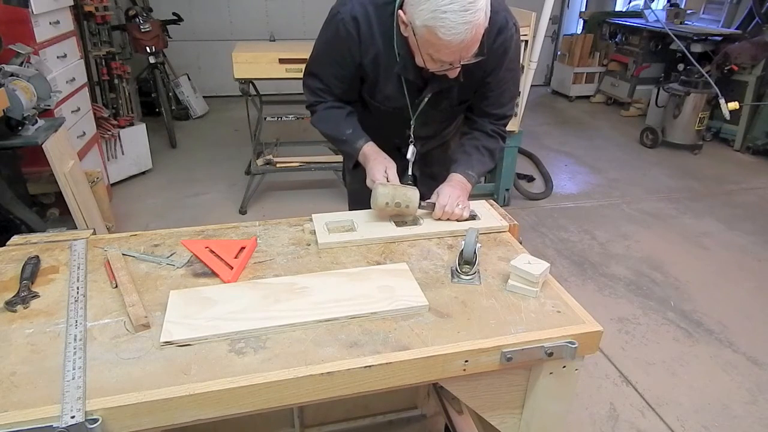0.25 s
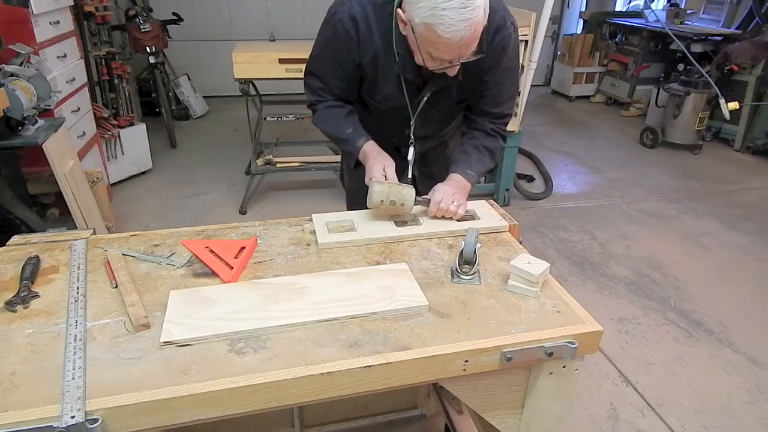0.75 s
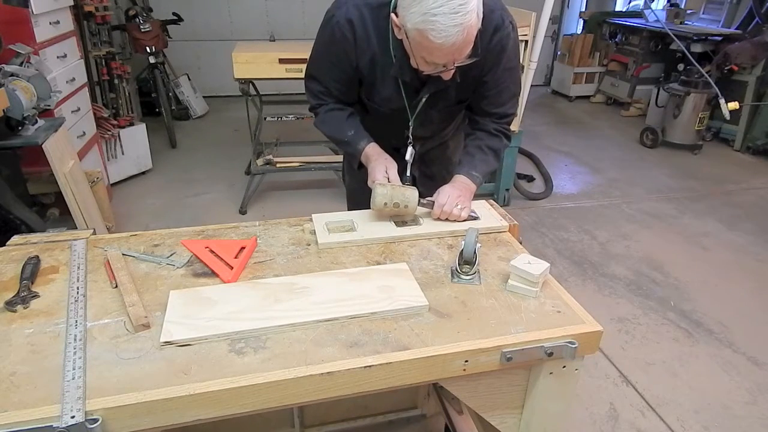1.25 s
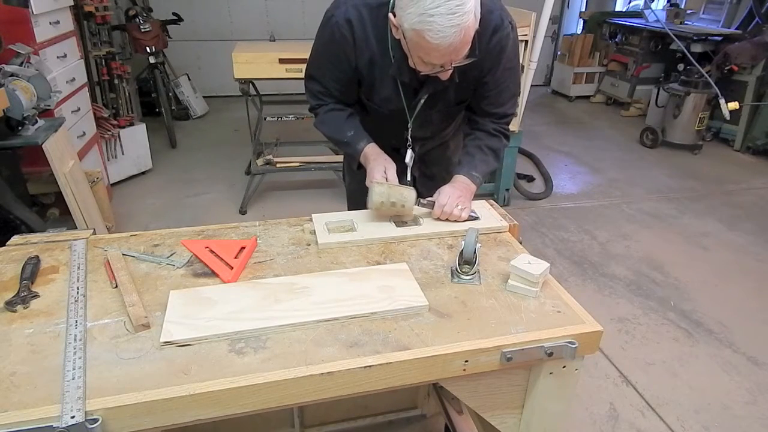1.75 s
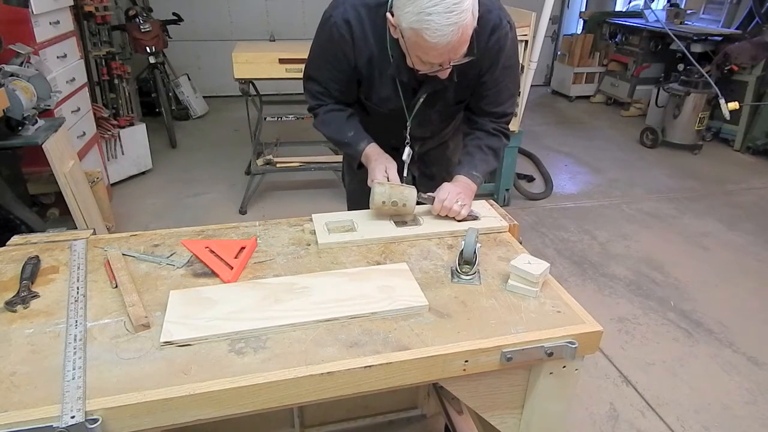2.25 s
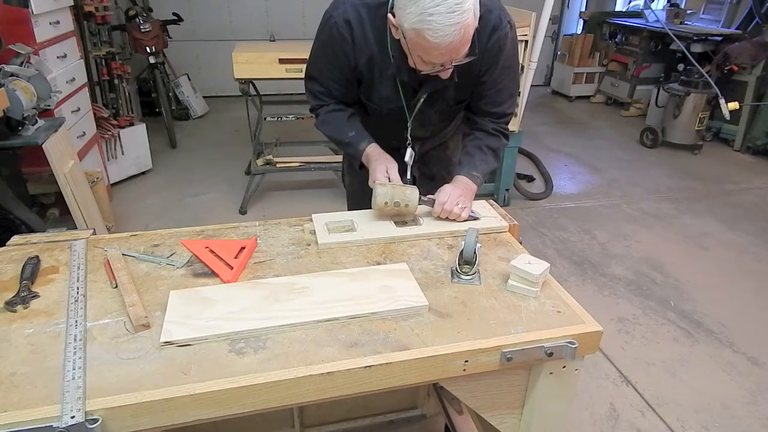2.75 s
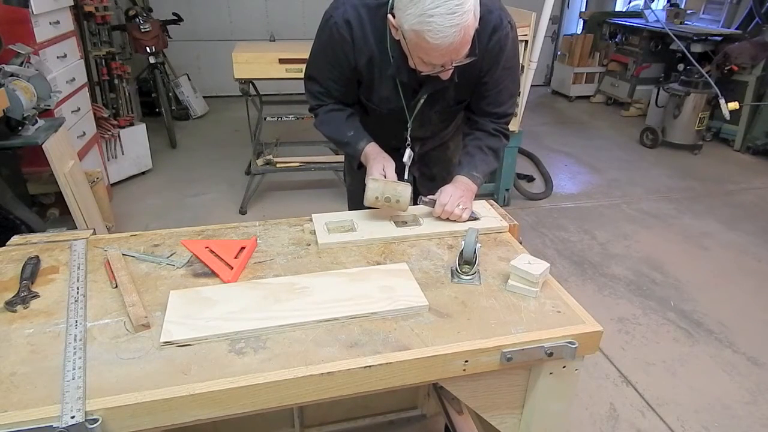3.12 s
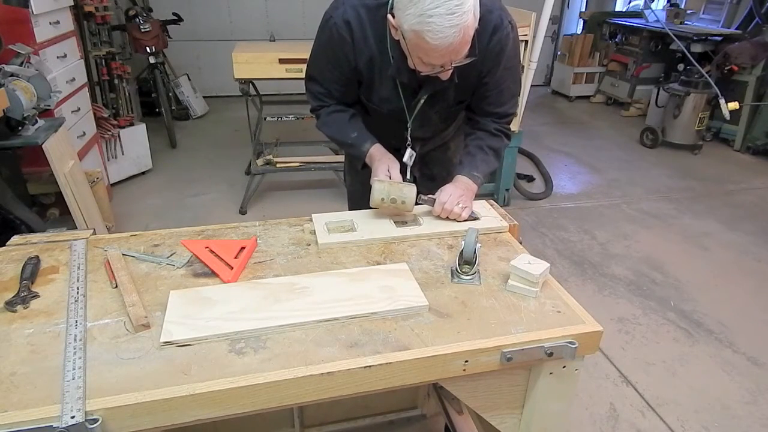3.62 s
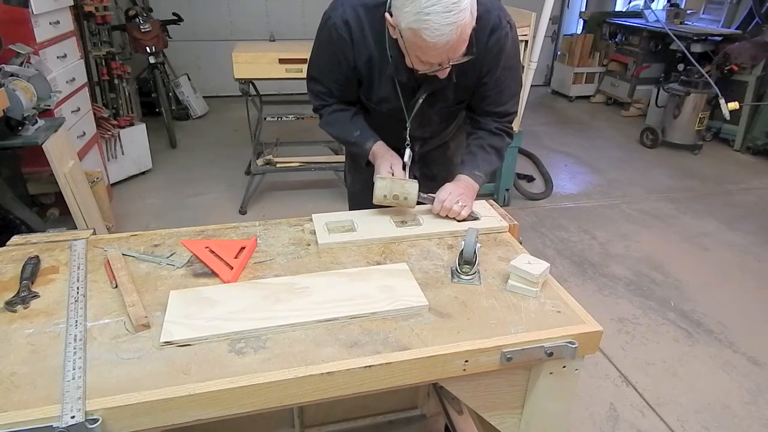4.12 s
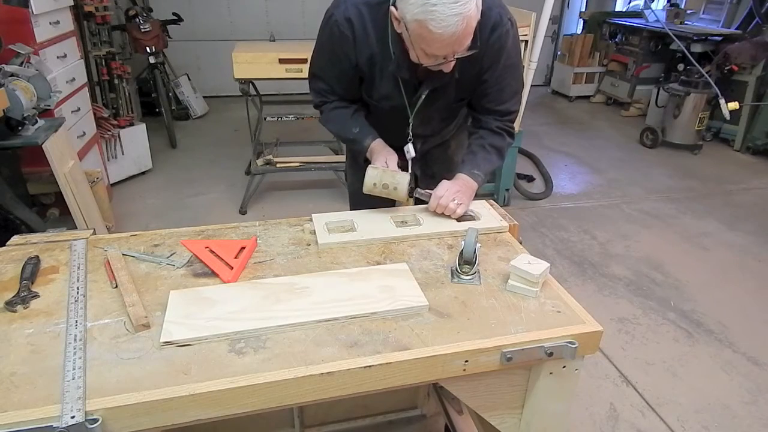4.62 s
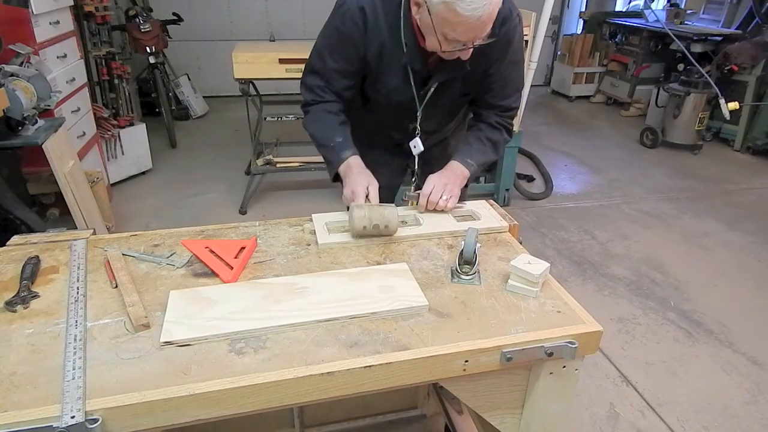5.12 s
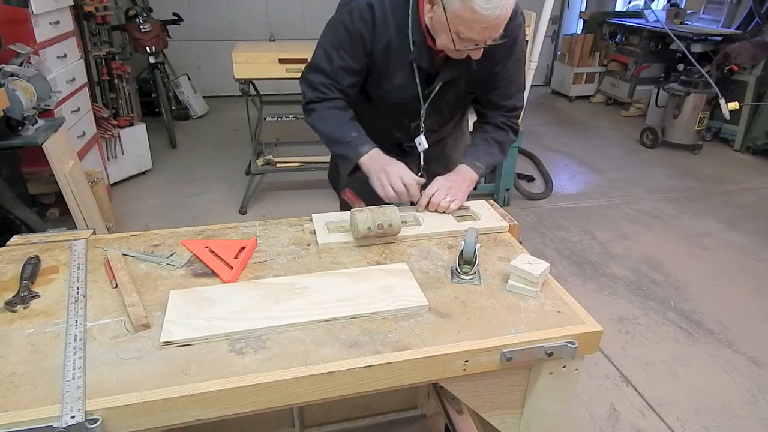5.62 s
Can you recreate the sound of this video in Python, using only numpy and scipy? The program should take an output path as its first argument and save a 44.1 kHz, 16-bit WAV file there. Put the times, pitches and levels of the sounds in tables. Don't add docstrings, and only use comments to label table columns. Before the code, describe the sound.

In a concrete garage workshop, a wooden mallet strikes a chisel in a board on a heavy bench. Three quick knocks, a pause, three more, another pause, then six evenly spaced blows, each a bright crack with a hollow woody ring. A small scrape and metallic tick follow, then the mallet lands on the bench in a few wooden knocks. Fairly close stereo microphone, faint motor hum beneath.

```python
import sys
import numpy as np
from scipy import signal
from scipy.io import wavfile
from scipy.ndimage import uniform_filter1d

SR = 44100
rng = np.random.default_rng(int(sys.argv[2]) if len(sys.argv) > 2 else 0)


def field_ratio(decibels):
    return 10 ** (np.asarray(decibels, dtype=float) / 20)


def wrap_up_sound(samples):
    columns = np.atleast_2d(samples).T
    tamed = np.clip(columns, -1, 1)
    steps = np.round(tamed * 32767).astype(np.int16)
    wavfile.write(sys.argv[1], SR, steps)


N = 258426
LEAD = 4096


def at_hz(points, hz):
    curve_hz, value = np.array(points).T
    return np.interp(np.log(hz), np.log(curve_hz), value)


EDGES_HZ = 25 * 2 ** np.arange(0, 9.6, .5)
# frequency in Hz, correlation (clipped to 0..1).
LIKENESS = [(60, 0.89), (150, 0.87), (380, 0.87), (950, 0.89), (2380, 0.096), (5980, -1.85), (15000, -.5)]
# frequency in Hz, left over right in dB.
LEFT_OVER_RIGHT = [(60, -2), (180, -3), (550, -2.0), (1650, -2), (4970, -1.5), (15000, 0)]


def stereo_bands(size):
    white = rng.standard_normal((2, 2, size + LEAD))
    for k, (low_hz, high_hz) in enumerate(zip(EDGES_HZ, EDGES_HZ[1:])):
        hz = np.sqrt(low_hz * high_hz)
        band = signal.butter(2, [low_hz, high_hz], "band", fs=SR, output="sos")
        mid, side = signal.sosfilt(band, white[k % 2])[:, LEAD:]
        alike = np.clip(at_hz(LIKENESS, hz), 0, 1)
        lean = field_ratio(at_hz(LEFT_OVER_RIGHT, hz) / 2 * np.array([[1], [-1]]))
        yield hz, lean * (np.sqrt(1 + alike) * mid + np.sqrt(1 - alike) * side * [[1], [-1]])


# frequency in Hz, density in dB per Hz.
FLOOR = [(15, -34), (25, 9.5), (92, 5.5), (373, -3.5), (476, -4.5), (659, -8), (962, -8), (1040, -16),
         (1440, -7), (2000, -16), (16000, -28.5)]
# frequency in Hz, level in dB rms.
HUM = [(120, -56.5), (479.5, -60), (959, -61.5), (1200, -70), (1438, -68.5)]


def background(floor_db=-49):
    noise = sum(band * field_ratio(at_hz(FLOOR, hz)) for hz, band in stereo_bands(N))
    t = np.arange(N) / SR
    hum = sum(np.sqrt(2) * field_ratio(level_db) * np.sin(2 * np.pi * (hz * t + rng.random()))
              for hz, level_db in HUM)
    return field_ratio(floor_db) * noise / noise.mean(axis=0).std() + hum


# frequency in Hz, T60 in seconds.
ROOM_T60 = [(60, 1), (160, 0.46), (420, 0.8), (1100, 0.59), (2900, 0.67), (7700, 0.52), (14000, 0.36)]
# frequency in Hz, level in dB.
ROOM_COLOUR = [(60, -10), (150, 2), (400, -2.5), (1000, 2), (2000, -5), (3800, -3), (5400, -22), (7600, -6),
               (10800, -4), (15200, -2)]


def workshop(x, first_echo_s=0.00043, build_s=0.0013):
    t = np.arange(SR) / SR
    tail = sum(band * field_ratio(at_hz(ROOM_COLOUR, hz) - 60 * t / at_hz(ROOM_T60, hz))
               for hz, band in stereo_bands(SR))
    tail = tail * (1 - np.exp(-np.maximum(t - first_echo_s, 0) / build_s))
    return signal.fftconvolve(x[None], tail, axes=1)[:, :x.size]


# centre time in seconds, level in dB, length in seconds, centre in Hz.
RUSTLES = [(0.663, -53, .05, 9800), (0.777, -56.5, 0.092, 8000), (0.904, -54, 0.42, 3800),
           (0.918, -57, 0.091, 11000), (4.583, -34, 0.017, 4150), (1.22, -50.5, 0.044, 3260),
           (2.465, -62, .03, 3300), (3.927, -45, 0.0075, 8600), (4.577, -43.5, 0.033, 9700),
           (5.713, -52, 0.085, 11800), (5.815, -49, 0.059, 10700)]


def rustles():
    out = np.zeros(N + LEAD)
    t = (np.arange(N + LEAD) - LEAD) / SR
    grains = rng.standard_normal(N + LEAD) * field_ratio(rng.exponential(1, N + LEAD))
    grains = grains / grains.std()
    for s, level_db, length_s, hz in RUSTLES:
        band = signal.butter(2, [hz * .65, min(hz * 1.5, .45 * SR)], "band", fs=SR, output="sos")
        stroke = np.exp(-((t - s) / length_s * 2) ** 2)
        out += field_ratio(level_db) * stroke * signal.sosfilt(band, grains)
    return out


def clicks_of(rows, column, extra_db, delay_s=0):
    rows, clicks = np.array(rows), np.zeros(N + LEAD)
    at = np.round((rows[:, 0] + delay_s) * SR).astype(int) + LEAD
    clicks[at] = field_ratio(rows[:, column] + extra_db)
    return clicks


def ring(clicks, hz, t60_s):
    r, w = field_ratio(-60 / (t60_s * SR)), 2 * np.pi * hz / SR
    return signal.lfilter([0, np.sin(w)], [1, -2 * r * np.cos(w), r * r], clicks + 1e-18)


def swell(x, hz, rise_s):
    r = np.exp(-1 / (rise_s * SR))
    poles = [1, -2 * r * np.cos(2 * np.pi * hz / SR), r * r]
    return signal.lfilter([(1 - r * r) / 2, 0, (r * r - 1) / 2], poles, x)


def struck(modes, rows, column, trim_db, scatter_db, rise_cycles=0, delay_s=0):
    out = np.zeros(N + LEAD)
    for k, (hz, level_db, t60_s) in enumerate(modes):
        hit_db = level_db + trim_db + scatter_db * rng.standard_normal(len(rows))
        clicks = clicks_of(rows, column, hit_db, delay_s)
        sound = ring(clicks * (-1) ** k, hz, t60_s)
        out += swell(sound, hz, rise_cycles / hz) if rise_cycles else sound
    return out


def contact(rows, edges_hz, bands, delay_s):
    out = np.zeros((3, N + LEAD))
    for k, ((low_hz, high_hz), (trim_db, t60_s)) in enumerate(zip(edges_hz, bands)):
        clicks = clicks_of(rows, k + 1, trim_db, delay_s)
        envelope = signal.lfilter([1], [1, -field_ratio(-60 / (t60_s * SR))], clicks + 1e-18)
        common, unlike = envelope * rng.standard_normal((2, N + LEAD))
        alike = at_hz(LIKENESS, np.sqrt(low_hz * high_hz))
        unlike = unlike * np.sqrt(np.clip(1 - alike, 0, 1))
        click = clicks * np.sqrt(t60_s * SR / np.log(1e6)) * (-1) ** k + 1e-18
        band = signal.butter(2, [low_hz, high_hz], "band", fs=SR, output="sos")
        out += signal.sosfilt(band, [common, unlike, click]) * np.sqrt(SR / 2 / (high_hz - low_hz))
    return out


# start in seconds, then knock, board, floor thud, bench in dB.
BLOWS = [(-.004, -14.5, -16.5, -16, -16), (0.1939, -12, -8.5, -19, -25.5), (0.4217, -9, -15, -27.5, -29),
         (1.5674, -20.5, -11.5, -20.5, -34), (1.794, -14, -13, -27, -22), (2.0169, -12, -22.5, -31.5, -32),
         (3.0025, -13, -16.5, -18, -19.5), (3.2385, -11.5, -21.5, -15, -17),
         (3.4711, -12, -26.5, -17, -18.5), (3.8246, -11.5, -28, -20, -15), (4.0698, -12, -22, -21.5, -17.5),
         (4.3245, -13.5, -16, -27, -29.5)]
# start in seconds, then knock, board, floor thud, high board in dB.
SET_DOWNS = [
    (1.3029, -43.5, -35.5, -33, -55),
    (2.648, -44, -41, -42.5, -57),
    (5.1188, -15.5, -24, -22, -11),
    (5.1705, -10, -14, -29.5, -22.5),
    (5.3832, -23, -28, -20, -18.5),
]
# start in seconds, then board, floor thud, bench in dB.
BUMPS = [(0.904, -65.5, -49, -60), (2.463, -70, -55, -45.5), (4.577, -43, -56, -53),
         (5.692, -47.5, -50, -53)]


def wood_hits():
    rows = []
    for s, knock, board, thud, bench_db in BLOWS:
        low = -3.5 + knock + 0.21 * (bench_db - knock)
        high = 5.5 + 1.4 * bench_db
        rows.append((s, board, thud, bench_db, low, high))
    for s, knock, board, thud, high in SET_DOWNS:
        low = -0.5 + knock + 0.58 * (thud - knock)
        rows.append((s, board, thud, thud - 6.5, low, high))
    for s, board, thud, bench_db in BUMPS:
        rows.append((s, board, thud, bench_db, board + 2, board - 8))
    return sorted(rows)


# start in seconds, level in dB, brightness in dB per band.
SNAPS = [(2.1726, -52.5, -0.5), (3.934, -37, -1.5), (4.8194, -43.5, 3.5), (5.086, -66.5, 10.5)]
# handle, chisel, crack, air in dB re the knock.
DULL_DB = (-19, -16, -36, -37.5)


def tool_hits(softer_is_duller=.05):
    rows = []
    for s, knock, board, _, _ in BLOWS:
        chisel = knock - 7.5 + 0.21 * board
        air = knock - 14 + 0.69 * board
        rows.append((s, knock, knock - 15, chisel, knock - 22.5, air))
    for s, knock, *_ in SET_DOWNS:
        rows.append((s, knock, *(knock + softer_is_duller * (knock + 20) + np.array(DULL_DB))))
    for s, level_db, tilt_db in SNAPS:
        rows.append((s, *(level_db + tilt_db * np.arange(-2, 3))))
    return sorted(rows)


# frequency in Hz, level in dB, T60 in seconds.
THUD_MODES = [(82.9, -15, 0.8), (104.7, 2, 0.21), (134.5, -32.5, 0.11), (134.8, -9, 0.28)]
BENCH_MODES = [(170.3, -7, 0.18), (192.8, -8, 0.32), (218.6, -8, 0.5), (237.7, -2.5, 0.45), (254.3, -21, 1)]
LOW_BOARD_MODES = [(352, -10.5, 0.63), (370.6, -10, 0.45), (416.3, -10, 0.56), (464, 1.5, 0.081),
                   (505.3, 2.5, 0.12), (597, -34, 0.11)]
BOARD_MODES = [(682.5, -10.5, 0.69), (716, -2.5, 0.29), (753, -3, 0.4), (789, -7.5, 0.42)]
HIGH_BOARD_MODES = [(907, 3, 0.063), (919, -7, 0.16), (955, -3, 0.093)]
KNOCK_MODES = [(1220, -35, 0.44), (1247, -15, 0.98), (1192, 4, 0.19), (1339, -11.5, 0.67),
               (1313, 1.5, 0.13), (1472, -13, 0.11), (1490, -16, 0.13), (1737, -26, 0.27), (1699, 7, 0.087),
               (1996, -31, 0.1)]


def bench():
    wood = wood_hits()
    out = struck(THUD_MODES, wood, 2, trim_db=10, scatter_db=3.5, rise_cycles=1.8, delay_s=0.0154)
    out += struck(BENCH_MODES, wood, 3, trim_db=5, scatter_db=4, rise_cycles=2.65, delay_s=0.00484)
    out += struck(LOW_BOARD_MODES, wood, 4, trim_db=3, scatter_db=2.5, rise_cycles=0.4)
    out += struck(BOARD_MODES, wood, 1, trim_db=-2.5, scatter_db=1.5, rise_cycles=1.1)
    out += struck(HIGH_BOARD_MODES, wood, 5, trim_db=2, scatter_db=-1, rise_cycles=0.77)
    out += struck(KNOCK_MODES, tool_hits(), 1, trim_db=-8.5, scatter_db=3.5, rise_cycles=0.62)
    return out


# low edge in Hz, high edge in Hz.
WOOD_HZ = [(640, 830), (70, 150), (150, 300), (300, 640), (830, 1000)]
# trim in dB, T60 in seconds.
WOOD_BANDS = [(0, 0.036), (7, 0.025), (5, 0.024), (5.5, 0.037), (-1.5, 0.051)]


def wood_thump():
    return contact(wood_hits(), WOOD_HZ, WOOD_BANDS, delay_s=0.0012)


# frequency in Hz, level in dB, T60 in seconds.
CHATTER_MODES = [(3390, -2.5, 0.0079), (2970, -7.5, 0.034)]


def chatter(gap_s=.0085, loss_db=4.5):
    return sum(struck(CHATTER_MODES, tool_hits(), 3, trim_db=7.5 - loss_db * k, scatter_db=4,
                      delay_s=gap_s * (k + 1)) for k in range(3))


# frequency in Hz, level in dB, T60 in seconds.
MALLET_MODES = [(1124, 2.5, 0.056), (1610, 5.5, 0.0086), (1610, -35, 0.01), (1834, -8.5, 0.0084)]
CHISEL_MODES = [(4256, 7.6, 0.017)]
BLADE_MODES = [(4460, 0, 0.029)]
# start in seconds, level in dB.
BLADE_TOUCHES = [(4.55, -47), (4.577, -32.5), (4.605, -45), (4.64, -55)]


def tools():
    hits = tool_hits()
    return (struck(MALLET_MODES, hits, 1, trim_db=0, scatter_db=2.5)
            + struck(CHISEL_MODES, hits, 3, trim_db=0, scatter_db=1.5)
            + struck(BLADE_MODES, BLADE_TOUCHES, 1, trim_db=0, scatter_db=0))


# low edge in Hz, high edge in Hz.
BLOW_HZ = [(1000, 1900), (1900, 3000), (3000, 5000), (5000, 9000), (9000, 14500)]
# trim in dB, T60 in seconds.
BLOW_BANDS = [(0, 0.1), (8, 0.022), (8, 0.014), (11, 0.017), (13, 0.024)]


def blow_crack():
    return contact(tool_hits(), BLOW_HZ, BLOW_BANDS, delay_s=0)


def scene():
    crack, crack_unlike, crack_click = blow_crack()
    thump, thump_unlike, _ = wood_thump()
    wood, rustle, rattle = bench(), rustles(), chatter()
    unlike = (0.29 * crack_unlike + .5 * thump_unlike) * [[1], [-1]]
    direct = field_ratio(-5.5) * crack + thump + tools() + wood + rustle + unlike
    direct = direct * field_ratio([[-1.2], [1.2]]) + rattle * field_ratio([[-1.5], [1.5]])
    wet = workshop(field_ratio(-36.5) * crack_click + field_ratio(-40) * crack + field_ratio(-33) * thump
                   + field_ratio(-36.5) * rattle + field_ratio(-46) * wood + field_ratio(-27) * rustle)
    bass_cut = signal.butter(4, 62, "high", fs=SR, output="sos")
    air_cut = signal.butter(2, 12600, fs=SR, output="sos")
    return signal.sosfilt(np.vstack([bass_cut, air_cut]), direct + wet)[:, LEAD:] + background()


def low_pass(x):
    return signal.sosfilt(signal.butter(12, 16270, fs=SR, output="sos"), x)


def record(dry, ceiling_db=-1.5, slope=0.057, release_db_per_s=150, top_hz=16100):
    dry = signal.sosfilt(signal.cheby2(12, 60, top_hz * 1.05, fs=SR, output="sos"), dry)
    level_db = 20 * np.log10(np.abs(dry).max(axis=0) + 1e-9)
    fall_db = release_db_per_s * np.arange(N) / SR
    held_db = np.maximum.accumulate(level_db + fall_db) - fall_db
    cut_db = uniform_filter1d(slope * np.maximum(held_db - ceiling_db, 0), size=89)
    mix = 1.148 * np.tanh(dry * field_ratio(-cut_db) / 1.705)
    return low_pass(mix)


dry = scene()
out = record(dry)
wrap_up_sound(out)
```